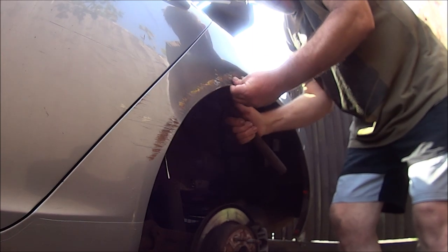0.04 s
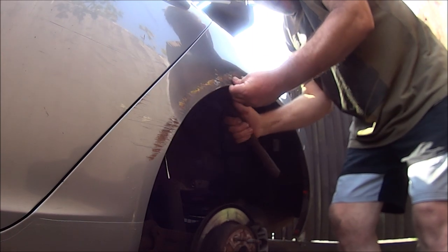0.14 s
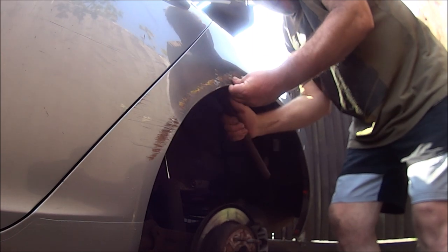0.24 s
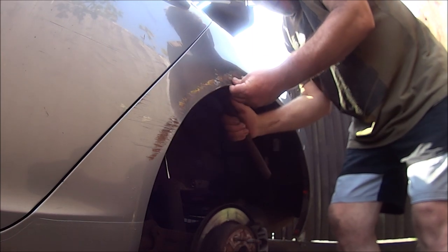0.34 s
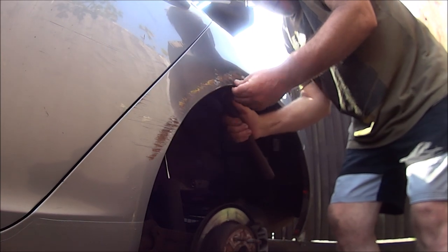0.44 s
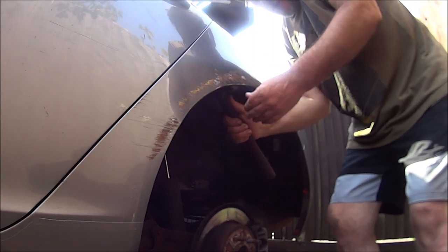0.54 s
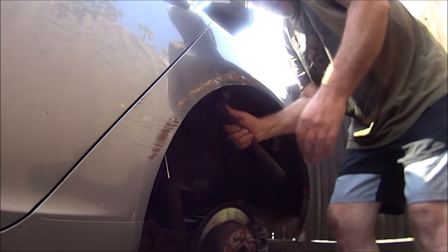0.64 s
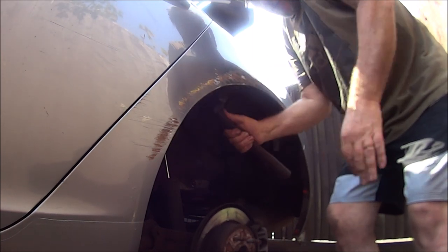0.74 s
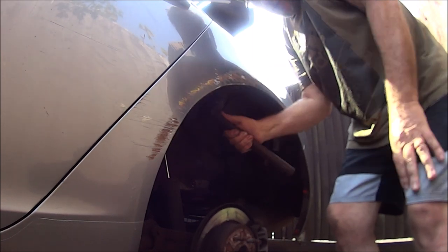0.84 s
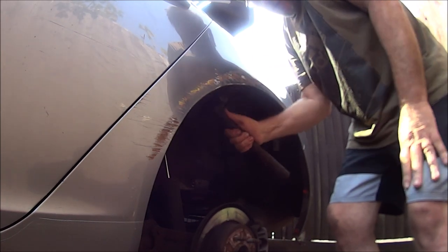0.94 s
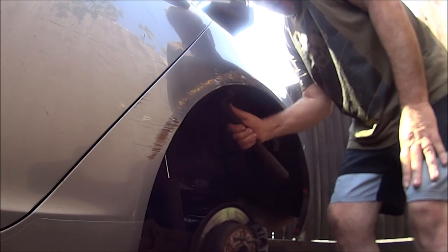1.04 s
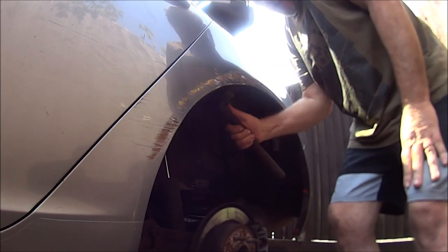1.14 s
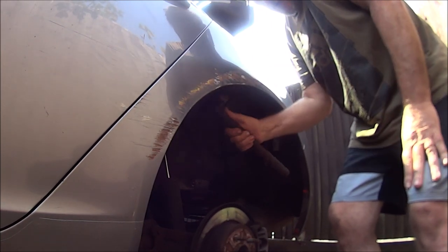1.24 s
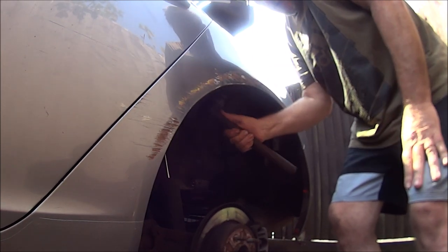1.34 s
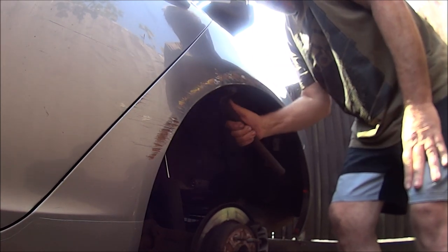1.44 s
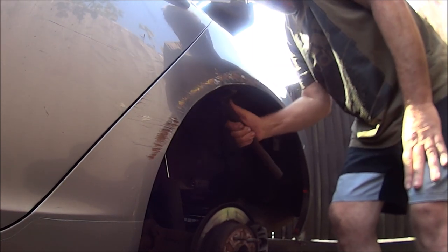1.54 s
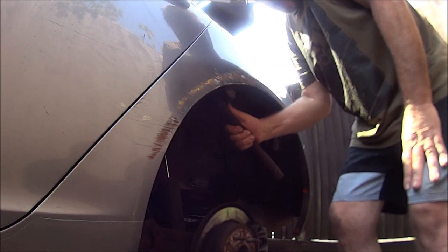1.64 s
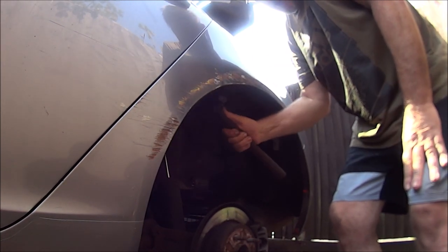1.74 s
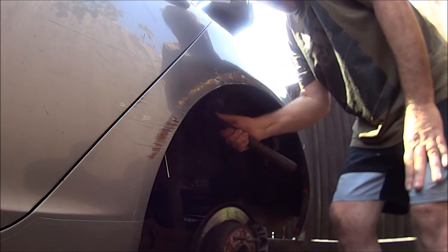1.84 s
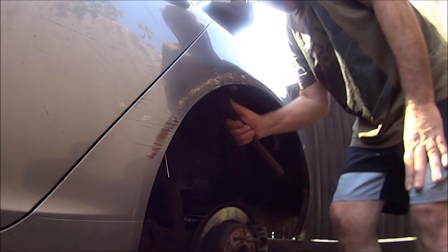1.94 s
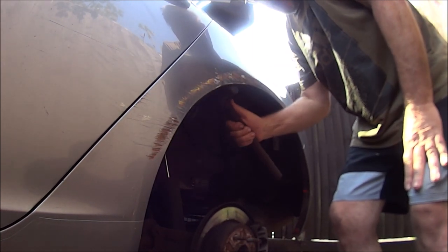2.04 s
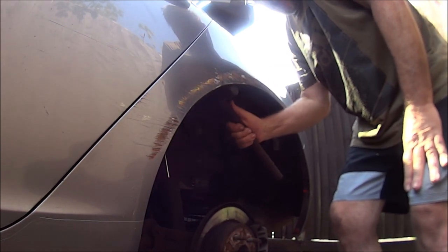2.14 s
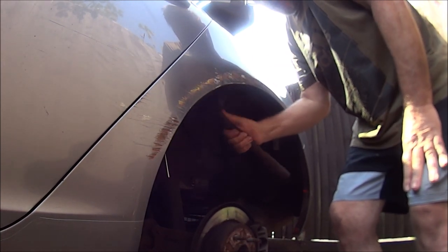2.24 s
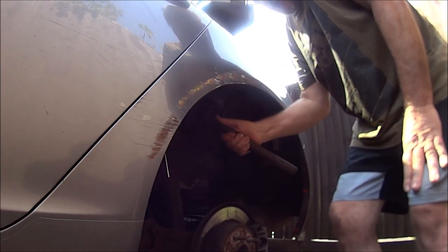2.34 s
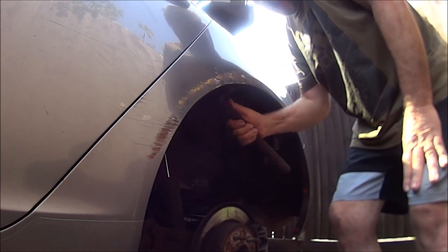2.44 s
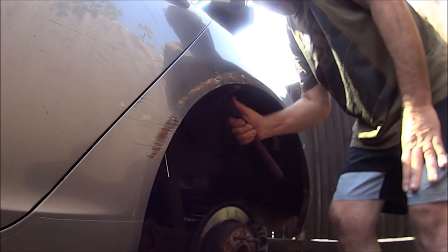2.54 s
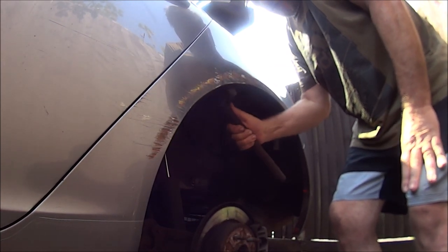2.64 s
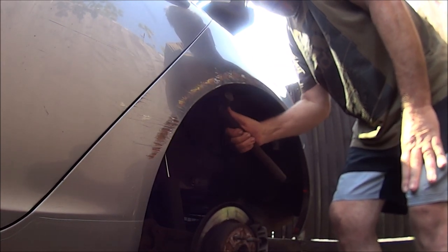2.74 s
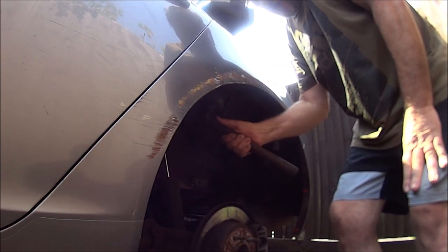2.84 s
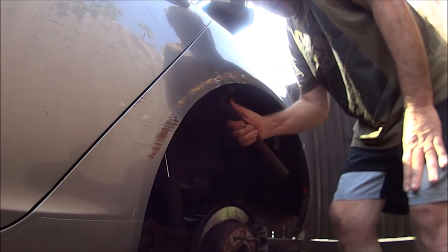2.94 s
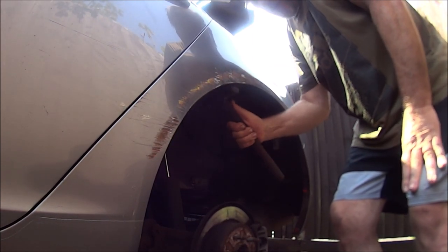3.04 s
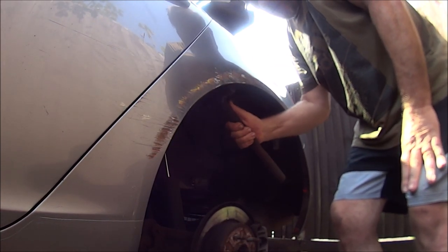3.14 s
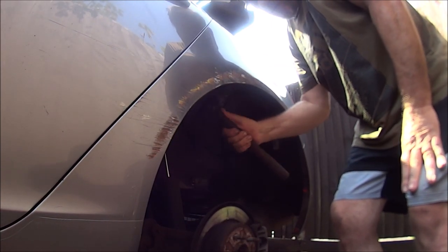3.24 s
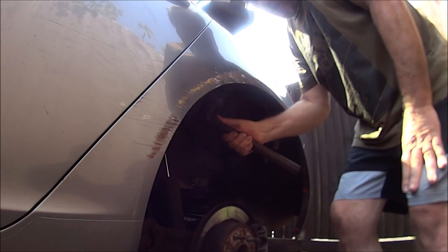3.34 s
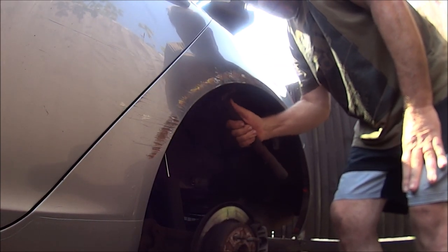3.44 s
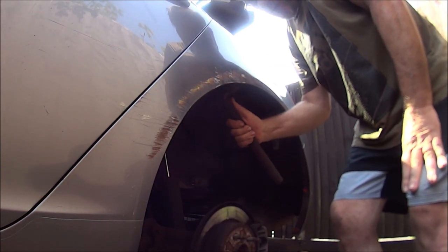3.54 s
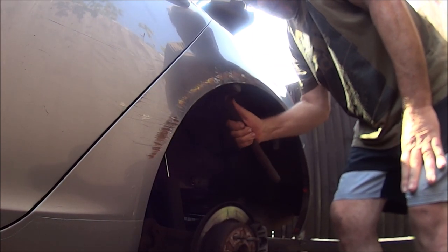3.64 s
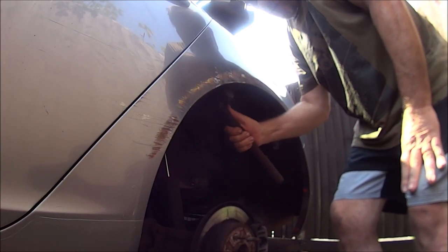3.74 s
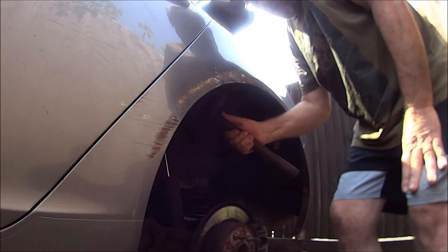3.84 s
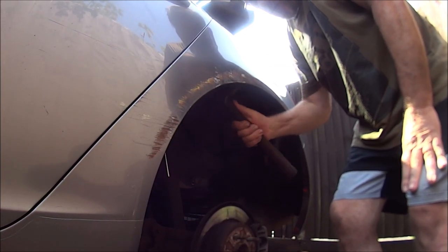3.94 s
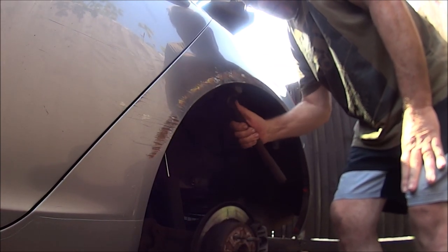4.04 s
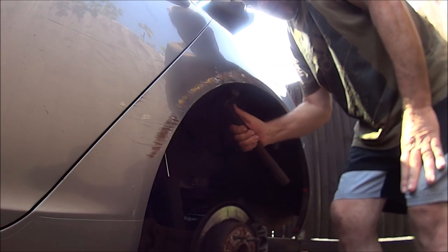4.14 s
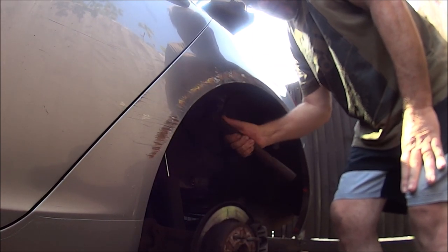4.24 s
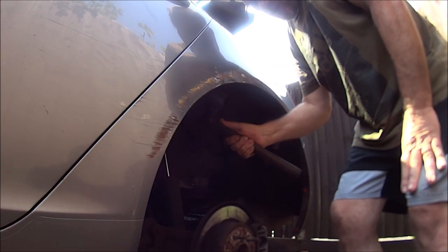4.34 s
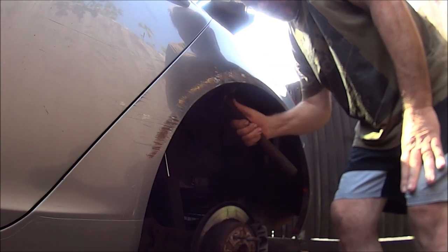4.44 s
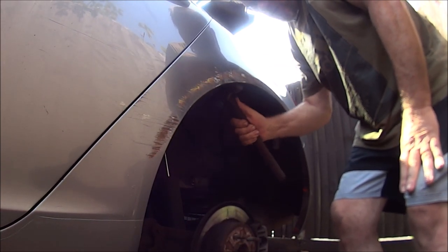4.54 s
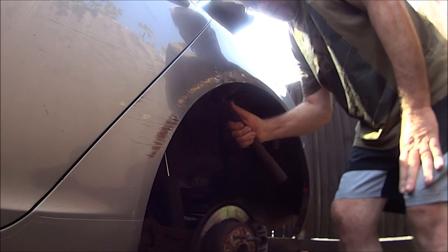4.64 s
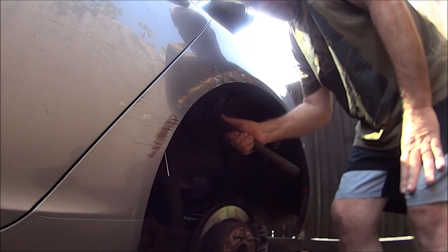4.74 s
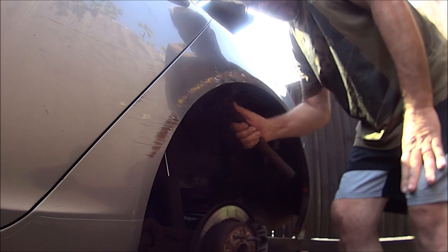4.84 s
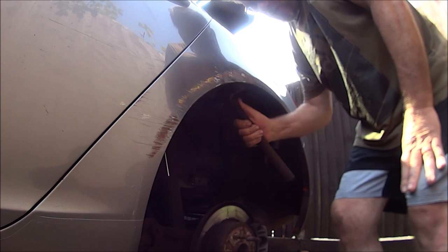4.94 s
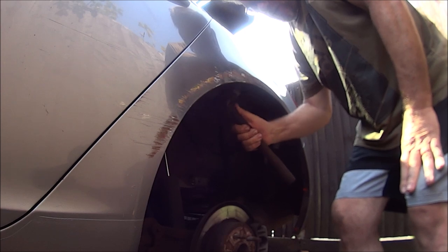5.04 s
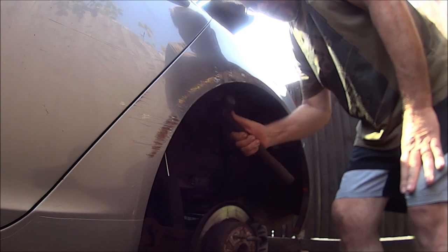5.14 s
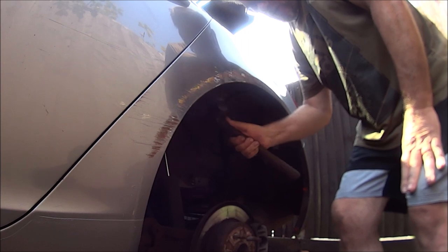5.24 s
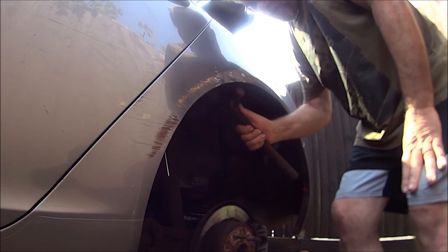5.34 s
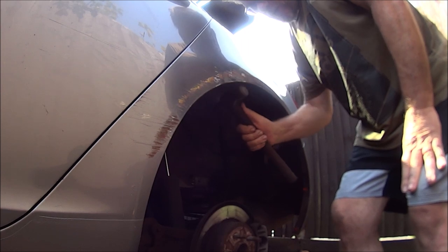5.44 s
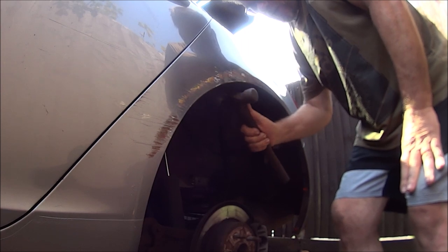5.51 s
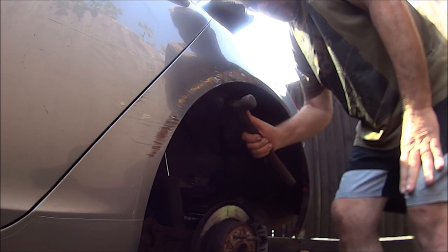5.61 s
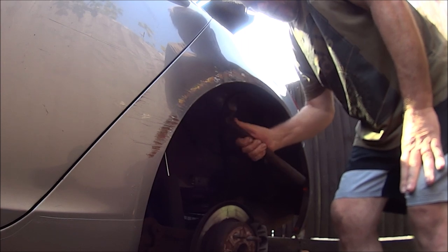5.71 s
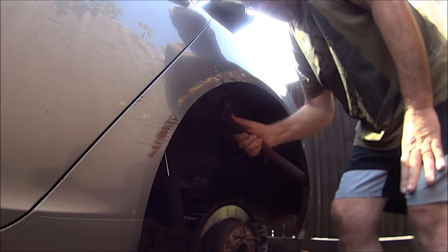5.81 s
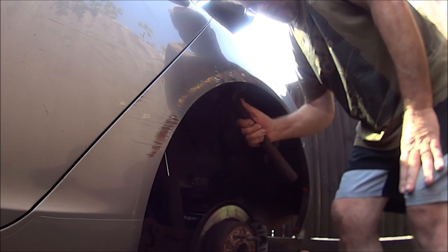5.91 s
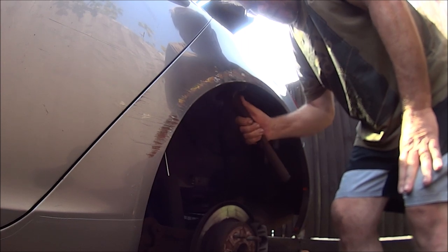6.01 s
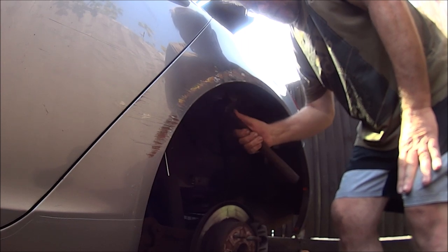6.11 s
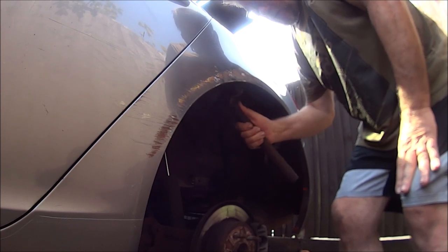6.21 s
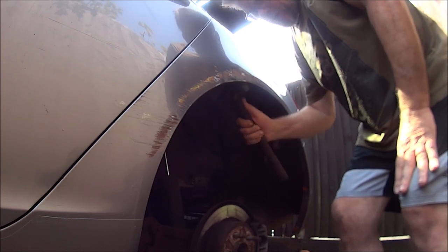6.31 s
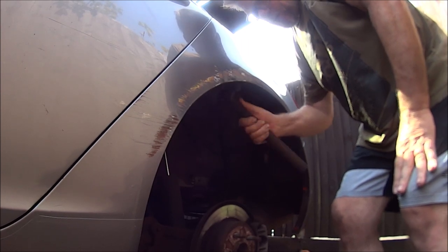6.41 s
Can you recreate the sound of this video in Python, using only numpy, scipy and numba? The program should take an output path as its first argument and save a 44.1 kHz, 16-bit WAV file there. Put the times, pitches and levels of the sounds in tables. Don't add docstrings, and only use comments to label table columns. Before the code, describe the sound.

In an open garage, a hand and tool scuff and lightly knock a car's steel wheel arch for about a second. Then a hammer strikes the panel every half second, each blow a hard clank with a hollow, quickly choked ring, often followed by a softer bounce. Close microphone, flattened peaks, faint yard hiss and hum. At the very end the hammering jumps to four times the speed and pitch.

```python
import sys
import numpy as np
from scipy import signal
from scipy.fft import rfft, irfft
from scipy.io import wavfile
from scipy.ndimage import uniform_filter1d
from numba import njit

SR = 44100
rng = np.random.default_rng(int(sys.argv[2]) if len(sys.argv) > 2 else 0)


def file_out(sig):
    cols = np.atleast_2d(sig).T
    lim = np.clip(cols, -1, 1)
    pcm = np.round(lim * 32767).astype(np.int16)
    wavfile.write(sys.argv[1], SR, pcm)


def natural_amplitude(level_db):
    exponent = np.asarray(level_db, float) / 20
    return 10 ** exponent


N = 285320
TIME_S = np.arange(N) / SR

# (frequency [Hz], density [dB per Hz])
YARD_AIR = [(15, -47.5), (25, -36), (87, -35), (124, -4.5), (327, -8.5), (372, -1.5), (422, -4), (573, -3),
            (759, -4.5), (1000, -6), (1080, -7.5), (4870, -10.5), (11000, -17.5), (14300, -104),
            (22000, -120)]
# (frequency [Hz], density [dB per Hz])
FAST_AIR = [(35, -66), (60, -23), (1170, -11), (1510, -11), (1660, -8), (1910, -10), (2520, -17),
            (3340, -7), (4030, -16.5), (16000, -19.5)]
# (frequency [Hz], density [dB per Hz])
TRAFFIC = [(15, 8), (30, 14), (70, 6), (140, -18), (300, -45)]
# (frequency [Hz], level [dB])
MAINS_HUM = [(102.3, -49), (199.2, -53), (301.5, -49.5), (376.8, -48), (403.7, -47), (602.9, -53),
             (705.2, -52), (780.6, -51.5)]
# (frequency [Hz], level [dB])
MACHINE = [(366.1, -69.5), (387.6, -73), (484.5, -63), (581.4, -90), (646.0, -61), (818.3, -60.5),
           (974.4, -63.5), (1464, -74)]
# (time [s], level [dB])
MACHINE_SWELL = [
    (0, 5),
    (1.2, -4),
    (2.2, -13),
    (3, -5),
    (4.5, -3.5),
    (6.2, 0),
]
# (frequency [Hz], level [dB])
FAST_MACHINE = [(3270, -73), (3400, -69), (3520, -77)]
# (frequency [Hz], density [dB per Hz])
PORT_HISS = [(12, -22), (20, 2), (228, -3), (291, -5), (1170, -6.5), (1410, -7), (2280, -4.5), (9950, -7),
             (12000, -16), (15600, -62.5), (22000, -120)]

# (time of full pressure [s], attack [s], hold [s], level [dB])
STROKES = [
    (0.001, 0.01, 0.00092, -33),
    (0.178, 0.11, 0.00088, -26),
    (0.476, 0.011, 0.045, -23.5),
    (0.621, 0.069, 0.001, -27.5),
    (1.2, 0.18, 0.022, -39.5),
]
# (frequency [Hz], density [dB per Hz])
SCUFFED_SHEET = [(60, -49), (170, -3), (330, -4), (560, -2), (1000, -2.5), (1450, -5), (2200, -16),
                 (4000, -29.5), (8000, -41), (13000, -100)]
# (time [s], peak [dB], boom [dB], ring stretch [ratio])
LIP_TAPS = [(0.0, -28.5, -13.5, 0.74), (0.152, -28, -17, 0.91), (0.182, -4, -10, 0.28),
            (0.204, -9.5, -10, 0.47), (0.225, -15, -9, 0.29), (0.325, -40, 1, 0.5), (0.339, -32, 5, 0.75),
            (0.383, -32, -13, 0.41), (0.476, -25, -3, .99), (0.51, -27.5, 5, 0.96), (0.531, -35, -14, 0.87),
            (0.619, -26.5, -0.5, 0.99), (0.631, -21, -21.5, 0.18)]

# (frequency [Hz], level [dB], decay t60 [s])
PANEL_MODES = [(107.9, -0.5, 0.23), (191.5, -0.5, 0.24), (331.6, -2.5, 0.17), (376, -29, 0.34),
               (526.8, -4.5, 0.33), (660, -22, 0.76), (706, 0, 0.16), (832, -18, 0.73), (943, -24, 0.63),
               (1030, -34.5, 0.54), (1035, -2, 0.077), (1170, -2, 0.085), (1248, -39.5, 0.14),
               (1396, 1, 0.037), (1530, -13.5, 0.28), (1684, -1, 0.054), (1798, 4, 0.033),
               (1985, -16.5, 0.18)]
# (frequency [Hz], density [dB per Hz])
MODE_CROWD = [(35, -51), (60, -48.5), (97, 1), (250, -6.5), (314, 4.5), (449, -11.5), (531, -5.5),
              (758, -5.5), (860, -10), (1340, -19), (9000, -37.5), (11700, -87), (19800, -120)]
# (frequency [Hz], t60 [s])
CROWD_DECAY = [(60, 0.52), (160, 0.33), (420, 0.26), (1100, 0.36), (2910, 0.27), (7680, 0.022)]
# (time [s], peak [dB], crack [dB], time until the hand chokes the
# ring [s])
DEEP_BLOW = [
    (1.219, -10, -11, 0.091),
]
# (time [s], peak [dB], crack [dB], choke time [s])
FULL_BLOWS = [
    (1.694, -2.5, -18.5, 0.077),
    (2.171, -4, -23.5, 0.074),
    (2.664, -4.5, -11, .073),
    (3.1504, -6.5, -10, 0.092),
    (3.6522, -5, -10, 0.065),
    (4.1428, -6.5, -9.5, 0.077),
    (4.6163, -4, -10, 0.089),
    (5.099, -5, -11, 0.086),
    (5.577, -1.5, -11, 0.074),
    (6.073, -1.5, -16.5, 0.078),
]
# (time [s], peak [dB], crack [dB], choke time [s])
SOFT_BOUNCES = [
    (2.779, -12.5, -85, 0.036),
    (3.251, -9, -15, 0.085),
    (3.817, -18, -101, 0.048),
    (4.244, -8, -35.5, 0.052),
    (4.706, -6, -32, 0.059),
    (5.19, -6.5, -57, 0.043),
]
# (time [s], peak [dB], crack [dB], choke time [s])
QUICK_BLOWS = [
    (6.137, -1.5, -19, 0.07),
    (6.2439, -7, -10.5, 0.067),
    (6.2642, -4.5, -22, 0.059),
    (6.3665, -5.5, -8.5, 0.13),
    (6.3903, -4.5, -27, 0.038),
]

BANDS_HZ = 70 * 2 ** np.arange(0, 7.2, 1 / 3)
CHANGE_S, CHANGE_FADE_S, SPEED = 6.165, 0.0027, 4
SCUFF_END_S = 1.22
SLOW_TOP_HZ, FAST_TOP_HZ, FAST_CLICK_HZ = 10800, 15700, 16500


def at_hz(table, hz):
    f, value = np.transpose(table)
    return np.interp(np.log(np.maximum(hz, 1)), np.log(f), value)


def noise(colour):
    spectrum = rfft(rng.standard_normal(N))
    x = irfft(spectrum * natural_amplitude(at_hz(colour, np.fft.rfftfreq(N, 1 / SR))), N)
    return x / x.std()


def walk(rate):
    k = int(SR / rate)
    x = uniform_filter1d(uniform_filter1d(rng.standard_normal(N), k), k)
    return x / x.std()


def band(x, hz, kind, order=3):
    return signal.sosfilt(signal.butter(order, hz, kind, fs=SR, output="sos"), x)


def wall(x, hz):
    return signal.sosfilt(signal.ellip(8, .3, 80, hz, fs=SR, output="sos"), x)


def onset(t, rise_s, power=2):
    return 1 - np.exp(-(t / rise_s) ** power)


def tones(lines, wobble_db, drift):
    out = np.zeros(N)
    for hz, db in lines:
        level = np.sqrt(2) * natural_amplitude(db + wobble_db * walk(13.0))
        phase = 2 * np.pi * hz * np.cumsum(1 + drift * walk(23.7)) / SR
        out += level * np.sin(phase)
    return out


def duck():
    yard_db, knock_db, blow_db, recover_db_s, smooth_s = -54.5, 3, 6.5, 1.5, 0.08
    loud = [(LIP_TAPS[2][0], knock_db)]
    loud += [(row[0], blow_db) for row in DEEP_BLOW + FULL_BLOWS + SOFT_BOUNCES]
    pulls = [(TIME_S > s) * np.maximum(db - recover_db_s * (TIME_S - s), 0) for s, db in loud]
    return yard_db - uniform_filter1d(np.max(pulls, axis=0), int(smooth_s * SR))


def yard():
    duck_db = duck()
    air = noise(YARD_AIR) * natural_amplitude(7.5 + 0.13 * walk(3) + duck_db)
    hum_db = duck_db + 51.0 - 12.6 * (TIME_S > SCUFF_END_S)
    hum = tones(MAINS_HUM, wobble_db=0.8, drift=0.0031) * natural_amplitude(hum_db)
    machine = tones(MACHINE, wobble_db=2.5, drift=0.0054)
    return air + hum + machine * natural_amplitude(np.interp(TIME_S, *np.transpose(MACHINE_SWELL)))


def garage(x):
    t = np.arange(int(.4 * SR)) / SR
    tail = rng.standard_normal(len(t)) * np.exp(-np.log(1000) * t / 0.35) * (t > .048)
    tail = signal.lfilter([1], [1, -.8], tail)
    tail /= np.sqrt(np.sum(tail ** 2))
    return x + natural_amplitude(-34.0) * signal.fftconvolve(x, tail)[:N]


def pressure():
    rest_db, release_db_s = -44, 359
    levels = [np.full(N, rest_db)]
    for s, attack, hold, db in STROKES:
        rising = np.maximum(s - TIME_S, 0) / attack * (db - rest_db)
        releasing = np.maximum(TIME_S - s - hold, 0) * release_db_s
        levels.append(db - rising - releasing)
    return np.max(levels, axis=0)


def scuff(count=8):
    t = np.arange(int(.06 * SR)) / SR
    spots = noise(SCUFFED_SHEET)[:count * len(t)].reshape(count, -1)
    spots = spots * np.exp(-t / 0.0054) * onset(t, 0.0009, power=1)
    catches = (rng.random((count, N)) < 230 / SR) * rng.standard_normal(N)
    catches = catches * natural_amplitude(np.minimum(6.3 * rng.exponential(size=N), 5.5))
    x = signal.fftconvolve(catches, spots, axes=1).sum(axis=0)[:N]
    return x / x.std() * natural_amplitude(pressure() - 4.0) * (TIME_S < SCUFF_END_S)


def sheet_bands(colour):
    size = 2 ** 16
    f = np.fft.rfftfreq(size, 1 / SR)
    octaves = np.log2(np.maximum(f, 1) / BANDS_HZ[:, None])
    shape = np.exp(-.5 * (octaves / .13) ** 2)
    x = irfft(rfft(rng.standard_normal((len(BANDS_HZ), size))) * shape)
    weight = natural_amplitude(at_hz(colour, BANDS_HZ)) * np.sqrt(BANDS_HZ / 500)
    return x / x.std(axis=1, keepdims=True) * weight[:, None]


def tilt(hz, boom_db, crack_db):
    low_db = (boom_db + 10) / (1 + (hz / 300) ** 4)
    high_db = 0.46 * (crack_db - 3.5) / (1 + (1800 / hz) ** 4)
    return natural_amplitude(low_db + high_db)


def crowd_ring(sheet, step, boom_db, crack_db, late_s):
    t = step / SR
    fall = np.exp(-np.log(1000) * np.outer(1 / at_hz(CROWD_DECAY, BANDS_HZ), t))
    crowd = tilt(BANDS_HZ, boom_db, crack_db) @ (sheet[:, step + rng.integers(40000)] * fall)
    lows = band(crowd, 200, "low", order=1) * onset(t, late_s, power=1)
    return band(crowd, 220, "high", order=1) + lows


def mode_ring(t, boom_db, crack_db, modes_db, speed):
    hz, db, t60 = np.transpose(PANEL_MODES)
    spot, detune = rng.standard_normal((2, len(hz)))
    swing = np.sin(2 * np.pi * np.outer(hz * (1 + 0.0069 * detune), t))
    swing *= np.exp(-np.log(1000) * np.outer(1 / t60, t))
    rattle = uniform_filter1d(rng.standard_normal(swing.shape), size=400 // speed)
    swing *= natural_amplitude(3.15 * np.sqrt(400 / speed) * rattle)
    level = natural_amplitude(db + modes_db + 1.8 * spot) * np.sign(detune)
    return (level * tilt(hz, boom_db, crack_db)) @ swing


def dent_flap(t, flap_hz, boom_db, crack_db):
    hz = flap_hz * np.exp(0.018 * rng.standard_normal() - 0.034 * (boom_db + 17))
    flap = np.sin(2 * np.pi * hz * t) * np.exp(-(t / 0.0024) ** 2)
    return flap * onset(t, 0.00015 * natural_amplitude(np.clip(-.5 * (crack_db + 13.5), -6, 12)))


def steel_crack(t, speed):
    burst = band(rng.standard_normal(len(t)), 4630 * speed ** 0.44, "low", order=2)
    burst = band(burst, 1160, "high", order=1)
    return burst * 1.52 * (np.exp(-(t / 0.0014) ** 2) + 0.091 * np.exp(-t / 0.016))


def landings(table, boom_db, stretch, per_db):
    boom_db_s = 2.04
    return [(s, peak_db, boom_db + boom_db_s * (s - 3.5), crack_db, stretch + per_db * (peak_db + 12.5), choke_s)
            for s, peak_db, crack_db, choke_s in table]


def blows(table, sheet, modes_db, flap_db, flap_hz, late_s, speed=1):
    out = np.zeros(N + SR)
    step = np.arange(int(.5 * SR / speed)) * speed
    t = step / SR
    graze_n = 160 // speed
    for s, peak_db, boom_db, crack_db, stretch, choke_s in table:
        choke = 1 / (1 + np.exp(np.clip((choke_s - t) / 0.0058, -50, 50)))
        ring = crowd_ring(sheet, step, boom_db, crack_db, late_s) * natural_amplitude(-9 * choke)
        ring += mode_ring(t, boom_db, crack_db, modes_db, speed) * natural_amplitude(-7.5 * choke)
        ring *= np.exp(-t * 25 * (1 / np.clip(stretch, .2, 3) - 1))
        ring *= onset(t, 0.0016 + 0.00003 * max(-32 - crack_db, 0))
        ring /= np.sqrt(np.mean(ring[:int(.03 * SR / speed)] ** 2))
        hit = natural_amplitude(-8.0) * ring
        hit += natural_amplitude(flap_db + 0.083 * peak_db) * dent_flap(t, flap_hz, boom_db, crack_db)
        hit += natural_amplitude(crack_db + 12.0) * steel_crack(t, speed)
        graze = band(rng.standard_normal(graze_n), 3000, "low", order=1) * np.linspace(0, 1, graze_n) ** 3
        hit = np.r_[natural_amplitude(0.6 * crack_db - 8) * graze, hit][:len(t)]
        i = max(int((s + 0.000984 / speed) * SR) - graze_n, 0)
        out[i:i + len(t)] += natural_amplitude(peak_db) * hit
    return out[:N]


def lip_taps():
    crack_db, choke_s = -31.5, 0.05
    table = [(s, db, boom_db, crack_db, stretch, choke_s) for s, db, boom_db, stretch in LIP_TAPS]
    return blows(table, sheet_bands(SCUFFED_SHEET), modes_db=-6.5, flap_db=-1, flap_hz=403, late_s=0.0039)


def hammering(sheet):
    table = landings(DEEP_BLOW, boom_db=-13.5, stretch=1, per_db=.001)
    table += landings(FULL_BLOWS, boom_db=-18.5, stretch=0.96, per_db=0.0009)
    table += landings(SOFT_BOUNCES, boom_db=-15.5, stretch=0.53, per_db=0.015)
    return blows(sorted(table), sheet, modes_db=-2.0, flap_db=6.5, flap_hz=580, late_s=0.045)


def fast_hammering(sheet):
    table = landings(QUICK_BLOWS, boom_db=-16, stretch=0.93, per_db=0.001)
    return blows(table, sheet, modes_db=-0.5, flap_db=4.0, flap_hz=680, late_s=0.02, speed=SPEED)


@njit
def squeeze(x, top, power, attack, release):
    gain, e = np.ones(len(x)), 0.
    for i in range(len(x)):
        a = abs(x[i])
        e += (a - e) * (attack if a > e else release)
        if e > top:
            gain[i] = (top / e) ** power
    return gain


def limiter(x, speed=1):
    attack_s, release_s = 0.0086, .06
    x = x * squeeze(x, 0.15, 0.98, speed / (attack_s * SR), speed / (release_s * SR))
    return x / (1 + np.abs(x / .5) ** 8) ** (1 / 8)


def scene():
    sheet = sheet_bands(MODE_CROWD)
    work = band(garage(hammering(sheet) + lip_taps() + scuff()), 72, "high")
    slow = wall(limiter(work + yard()), SLOW_TOP_HZ) + noise(TRAFFIC) * natural_amplitude(-78)

    fast = 1.03 * limiter(band(fast_hammering(sheet), 430, "high"), SPEED)
    fast = wall(fast, FAST_CLICK_HZ) + wall(noise(FAST_AIR), FAST_TOP_HZ) * natural_amplitude(-53.5)
    fast += tones(FAST_MACHINE, wobble_db=4.0, drift=0.0027)

    since_change = TIME_S - CHANGE_S
    fade = 1 / (1 + np.exp(np.clip(since_change / CHANGE_FADE_S, -50, 50)))
    mid = slow * fade + fast * np.clip((since_change + .005) / .0015, 0, 1)
    hiss_level = natural_amplitude(-70) * (fade + 0.26) + natural_amplitude(-36.0) * uniform_filter1d(mid ** 2, 400)
    side = wall(noise(PORT_HISS) * hiss_level, SLOW_TOP_HZ) + natural_amplitude(-49.5) * walk(300) * mid
    return np.array([mid + side, mid - side])


def low_pass(x):
    return signal.sosfilt(signal.butter(12, 17140, fs=SR, output="sos"), x)


def record(dry):
    return low_pass(dry)


dry = scene()
out = record(dry)
file_out(out)
```